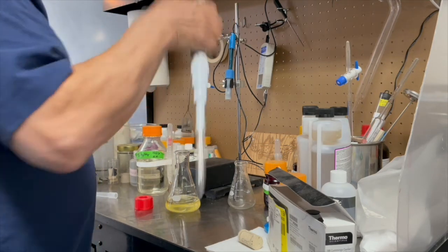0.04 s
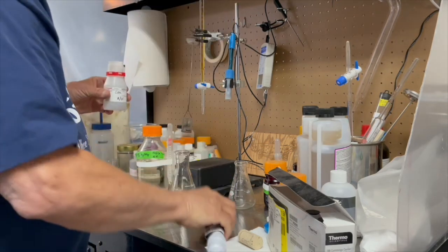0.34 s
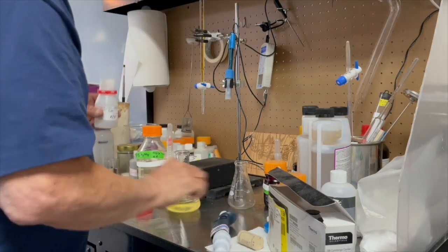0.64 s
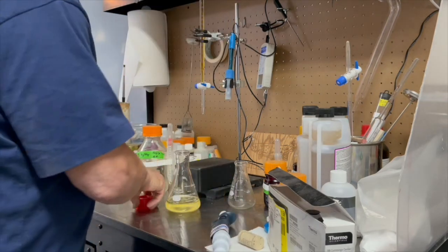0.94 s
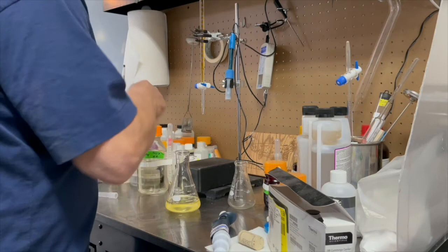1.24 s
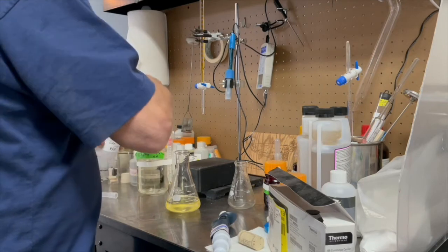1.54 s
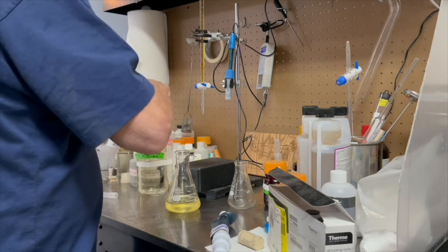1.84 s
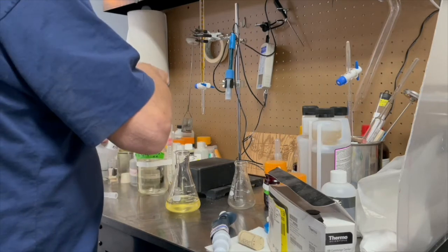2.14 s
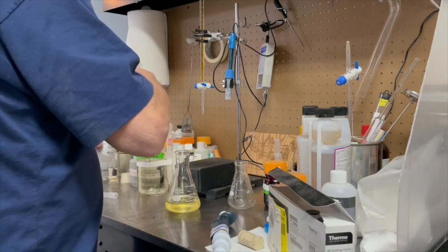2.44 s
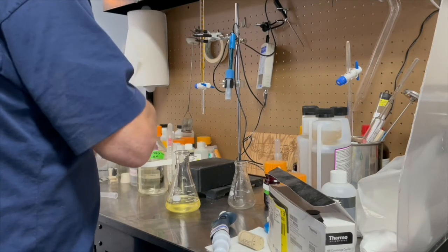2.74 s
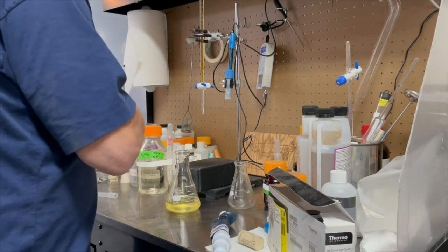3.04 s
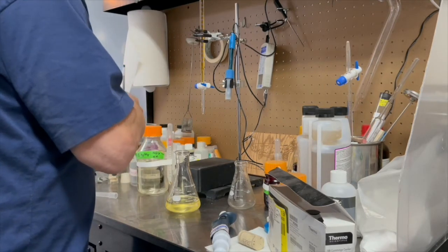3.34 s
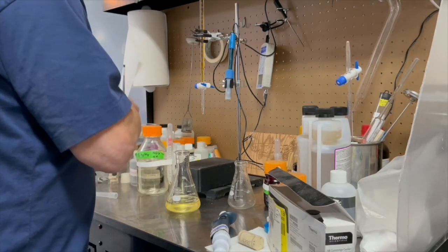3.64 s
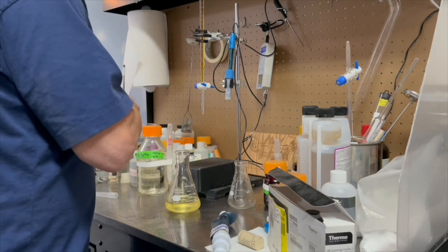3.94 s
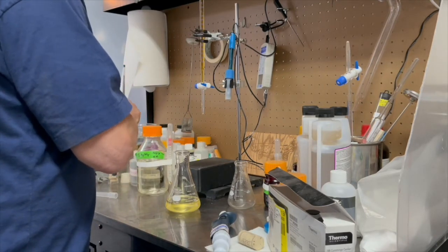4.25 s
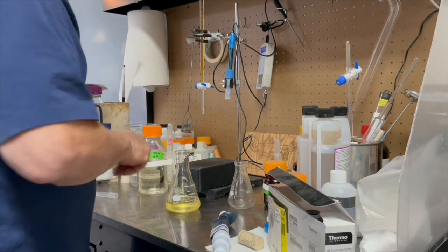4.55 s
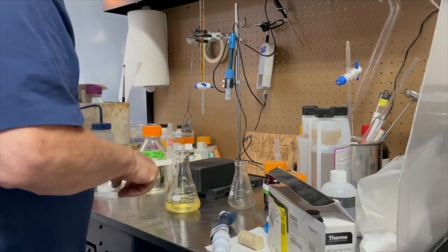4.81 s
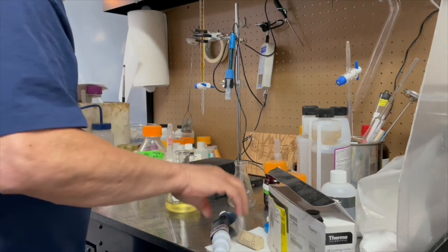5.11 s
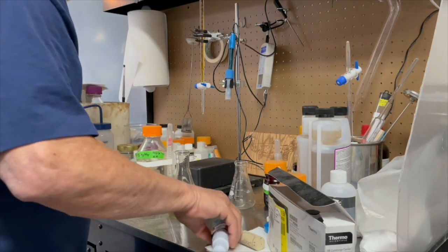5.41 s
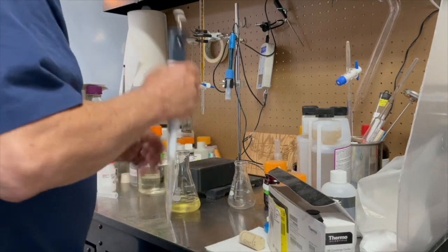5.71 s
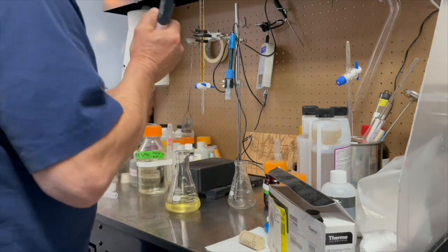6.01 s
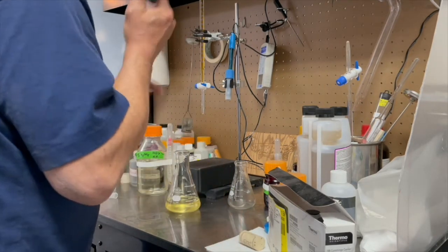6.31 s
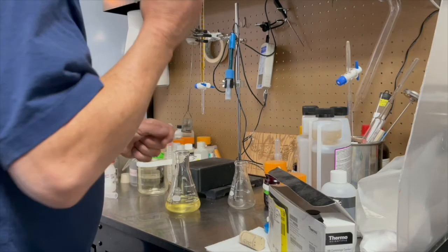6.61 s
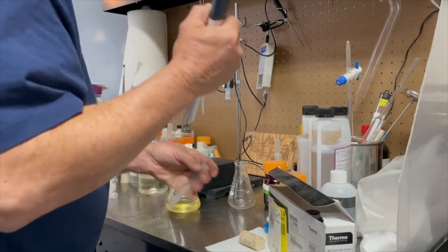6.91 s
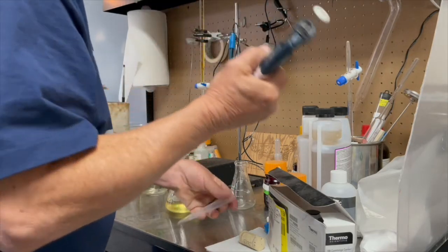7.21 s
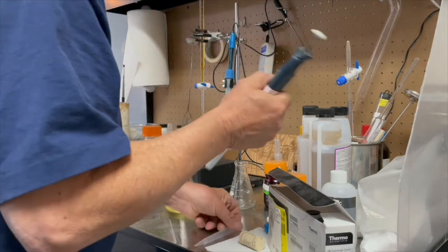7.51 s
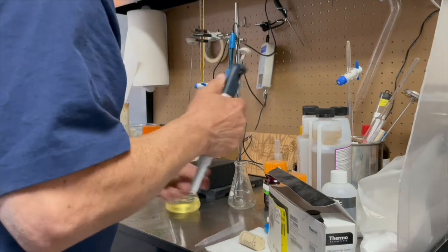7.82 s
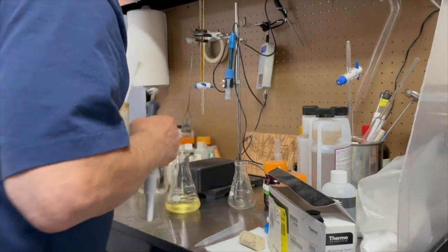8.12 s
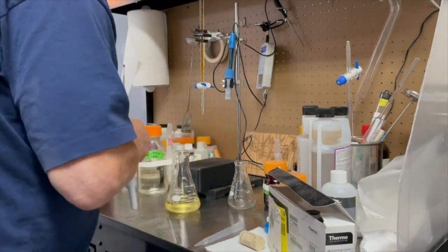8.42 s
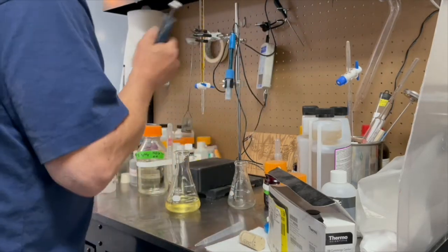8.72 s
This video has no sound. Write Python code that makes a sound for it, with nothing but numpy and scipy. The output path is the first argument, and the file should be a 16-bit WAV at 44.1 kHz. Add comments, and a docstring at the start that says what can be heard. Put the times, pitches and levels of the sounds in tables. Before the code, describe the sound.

Plastic thuds and rattles on metal, a bottle cap pops and rasps shut, and a pipette clicks in a quietly humming lab.

```python
"""Pipette and bottle at a lab bench

A dropped pipette thumps a steel bench and rocks to rest. A plastic cap pops onto a bottle and is
screwed down in short twists, rasping and catching on the thread; the bottle lands with a dull knock.
The pipette is picked up, its mechanism clicks and a hollow plastic tip clacks onto the bench.
Underneath, a sleeve rustles and the ventilation hums in the small room."""
import sys
import numpy as np
from scipy import signal
from scipy.fft import rfft, irfft, next_fast_len
from scipy.io import wavfile
from scipy.ndimage import uniform_filter1d

SR = 44100
rng = np.random.default_rng(int(sys.argv[2]) if len(sys.argv) > 2 else 0)


def file_out(sig):
    """Save sig as 16-bit WAV at sys.argv[1]."""
    # one column per channel
    cols = np.atleast_2d(sig).T
    # limit, then scale
    lim = np.clip(cols, -1, 1)
    pcm = np.round(lim * 32767).astype(np.int16)
    wavfile.write(sys.argv[1], SR, pcm)


N = 386316
TIME = np.arange(N) / SR
BLOCK = 4096   # samples in one hit or filter response

# tone of the cap rubbing on its thread: (frequency [Hz], level [dB])
CAP_COLOUR = [(100, -13.5), (400, 10), (850, -0.5), (1250, -5.5), (1650, -6.5), (2100, 1.5), (2700, -8.5),
              (3600, -12), (4600, -17.5), (7000, -23.5), (15000, -38.5)]
# tone of fingers on plastic: (frequency [Hz], level [dB])
GRIP_COLOUR = [(400, 10), (1800, 3.5), (3500, -0.5), (7000, -6), (15000, -12.5)]


def from_db(db):
    """Decibels to gain."""
    return 10 ** (np.asarray(db) / 20)


def unit_rms(x):
    """Scale to rms 1."""
    return x / np.sqrt(np.mean(x ** 2) + 1e-20)


def at_hz(points, hz):
    """Read a curve on a log-frequency axis."""
    freqs, values = np.transpose(points)
    return np.interp(np.log(np.maximum(hz, 1)), np.log(freqs), values)


def decay(t, t60):
    """Envelope that loses 60 dB in t60 seconds."""
    return np.exp(-np.log(1000) * t / t60)


def add(track, start_s, sound):
    """Mix a sound into a track."""
    i = max(round(start_s * SR), 0)
    track[i:i + len(sound)] += sound[:N - i]


def panned(x, left_db):
    """Make the left channel louder than the right by left_db."""
    return x * from_db([[left_db / 2], [-left_db / 2]])


def coloured(x, colour, tilt_db=0):
    """Minimum-phase EQ that gives a short drive its broad tone, tilted per octave; energy 1."""
    hz, drive = np.fft.rfftfreq(len(x), 1 / SR), rfft(x)
    drive_tone = np.sqrt(uniform_filter1d(np.abs(drive) ** 2, size=len(hz) // 45) + 1e-12)
    gain = from_db(at_hz(colour, hz) + tilt_db * np.log2(np.maximum(hz, 200))) / drive_tone
    cepstrum = irfft(np.log(gain))
    cepstrum[len(hz) - 1:] = 0   # no ringing ahead of the attack
    sound = irfft(drive * np.exp(2 * rfft(cepstrum)))
    return sound / np.linalg.norm(sound)


def filtered(x, colour):
    """Give a long white signal its tone; rms 1."""
    response = coloured(signal.unit_impulse(BLOCK), colour)
    return unit_rms(signal.oaconvolve(x, response)[:N])


def resonating(x, modes):
    """The drive plus the ringing of every mode that it feeds."""
    return x + sum(from_db(db) * signal.lfilter(*signal.iirpeak(hz, hz / width, fs=SR), x)
                   for hz, width, db in modes)


def dispersed(x, below_hz):
    """Bending waves: the lows travel slower, which smears each click a little."""
    pole = np.exp(-2 * np.pi * below_hz / SR)
    return signal.lfilter([-pole, 1], [1, -pole], x)


def diffuse(a, b):
    """Two unrelated signals become a stereo field, wide in the mids, narrow in bass and treble."""
    # likeness of left and right: (frequency [Hz], correlation [0-1])
    likeness = [(60, .88), (200, 0.91), (400, 0.37), (750, .0), (1300, 0.16), (2200, 0), (4400, 0.99),
                (8000, 1), (14000, 1)]
    size = next_fast_len(len(a), real=True)
    alike = np.clip(at_hz(likeness, np.fft.rfftfreq(size, 1 / SR)), -.99, .99)
    mid = rfft(a, size) * np.sqrt((1 + alike) / 2)
    side = rfft(b, size) * np.sqrt((1 - alike) / 2)
    return irfft([mid + side, mid - side], size)[:, :len(a)]


def struck(force, level_db, colour, tilt_db):
    """The sound of a short force on an object; the level is that of its energy spread over 5 ms."""
    return from_db(level_db) * coloured(force, colour, tilt_db) * np.sqrt(.005 * SR)


def contact(level_db, colour, tilt_db, shiver_db, shiver_t60):
    """A click followed by a shiver: the dense, quickly dying vibration of the object."""
    shiver_low_hz = 449   # below this an object has only its few separate modes
    force = rng.standard_normal(BLOCK) * decay(TIME[:BLOCK], shiver_t60)
    force = signal.sosfilt(signal.butter(2, shiver_low_hz, "high", fs=SR, output="sos"), force)
    force *= from_db(shiver_db) / np.linalg.norm(force)
    force[0] = 1   # the click
    return struck(force, level_db, colour, tilt_db)


def hits(rows, colour, shiver_db, shiver_t60):
    """A run of contacts on one object."""
    out = np.zeros(N)
    for start_s, level_db, tilt_db in rows:
        add(out, start_s, contact(level_db, colour, tilt_db, shiver_db, shiver_t60))
    return out


def friction(colour, slips_per_s, spread_db):
    """Countless tiny slips of uneven size blend into a grainy hiss."""
    slipping = rng.random(N) < slips_per_s / SR
    sizes = from_db(spread_db * np.minimum(rng.exponential(1, N), 4))
    return filtered(slipping * sizes * rng.standard_normal(N), colour)


def strokes(rows):
    """Pressure swells and fades within each stroke."""
    out = np.zeros(N)
    for start_s, length_s, level_db in rows:
        add(out, start_s, from_db(level_db) * signal.windows.tukey(max(int(length_s * SR), 2), .5))
    return out


def room_echo(build_s):
    """Small-room response: reflections build up quickly and die sooner in the treble."""
    # room decay: (frequency [Hz], t60 [s])
    room_t60 = [(100, 0.67), (400, 0.59), (1200, 0.42), (3000, 0.33), (7000, 0.36), (15000, 0.23)]
    t = TIME[:SR * 3 // 4]
    hz = np.fft.rfftfreq(len(t), 1 / SR)
    white, tail = rfft(rng.standard_normal((2, len(t)))), 0
    centres, t60s = np.transpose(room_t60)
    for share, centre_hz, t60 in zip(np.eye(len(centres)), centres, t60s):
        band = irfft(white * at_hz(np.column_stack([centres, share]), hz), len(t))
        # the clutter behind the bench throws back the higher sounds first, briefly
        early = 1 + (centre_hz > 700) * from_db(-4) * decay(t, t60=.15)
        tail = tail + band * decay(t, t60) * early
    tail = tail * (1 - np.exp(-t / build_s))
    return diffuse(*unit_rms(tail)) / np.sqrt(len(t))


def ventilation():
    """A bed of dull rushing air with a few slightly wavering fan tones."""
    # tone of the moving air: (frequency [Hz], level [dB])
    air_colour = [(12, -36.5), (26, -25), (45, 0), (80, 1), (150, -4), (260, -3.5), (310, -8.5),
                  (380, -7.5), (560, -12.5), (800, -16.5), (1600, -35.5), (3800, -47.5), (7000, -52),
                  (14000, -57.5)]
    # fan and mains tones: (frequency [Hz], level [dB])
    hum_tones = [(70, -61), (258.4, -58), (360.3, -53.5), (479.5, -65)]
    air = diffuse(*[filtered(white, air_colour) for white in rng.standard_normal((2, N))])
    hum, knots = 0, np.linspace(0, TIME[-1], 30)
    for hz, level_db in hum_tones:
        waver_rad = np.interp(TIME, knots, rng.normal(0, 0.089, len(knots)))
        hum = hum + np.sqrt(2) * from_db(level_db) * np.sin(2 * np.pi * hz * TIME + waver_rad)
    return from_db(-48.5) * air + from_db(-2.0) * hum


def sleeve():
    """Cloth slides with a fine, high hiss that swells and dies with each movement of the arm."""
    # arm movements: (start [s], length [s], level [dB], change over the movement [dB])
    swishes = [(0.024, 0.4, -63.5, 12), (0.387, 0.27, -52.5, -5), (0.934, 0.44, -66, -14),
               (1.187, 0.46, -68, 4.5), (1.523, 0.44, -58.5, -9.5), (4.271, 0.73, -59, -7),
               (5.123, 0.44, -65.5, 0), (5.5, 0.26, -71, -2), (5.762, 0.16, -64, -3.5),
               (5.957, 0.15, -76, -3.5), (6.459, 0.98, -84, -2.5), (7.662, 0.51, -83, 11.5),
               (8.322, 0.17, -70, 3.5), (8.53, 0.32, -79, 4)]
    # tone of sliding cloth: (frequency [Hz], level [dB])
    cloth_colour = [(500, -20), (2000, -13), (4000, -25), (5500, -14.5), (9000, -6.5), (11900, -4.5),
                    (13300, -4), (16000, -24)]
    attack_s, release_s = 0.095, 0.14   # the arm gathers speed, then slows
    waver_db, wavers_per_s = 3.5, 22   # folds catch and let go
    speed = np.full(N, from_db(-85.5))   # the cloth is never quite still
    for start_s, length_s, level_db, change_db in swishes:
        t = TIME[TIME < length_s]
        ramp = np.clip(np.minimum(t / attack_s, (length_s - t) / release_s), 0, 1)
        add(speed, start_s, from_db(level_db + change_db * t / length_s) * np.sin(np.pi / 2 * ramp) ** 2)
    knots = np.arange(0, TIME[-1], 1 / wavers_per_s)
    folds = from_db(waver_db * np.interp(TIME, knots, rng.standard_normal(len(knots))))
    return speed * folds * friction(cloth_colour, slips_per_s=23000, spread_db=1.5)


def finger_rubs():
    """Fingers brush the cap and the pipette; each touch has a resonance of its own."""
    # brushes on plastic: (start [s], length [s], level [dB], resonance [Hz], resonance gain [dB])
    grips = [(0.883, 0.024, -67, 940, 25), (1.122, 0.032, -55, 1900, 7.5), (5.286, 0.14, -57.5, 2200, -16),
             (6.132, 0.065, -76.5, 1750, 24), (6.232, 0.079, -46, 4000, -6)]
    grain = friction(GRIP_COLOUR, slips_per_s=2900, spread_db=-2.0)
    out, grip_q = np.zeros(N), 2.9
    for start_s, length_s, level_db, hz, peak_db in grips:
        rub = strokes([(start_s, length_s, level_db)]) * grain + 1e-18
        out += resonating(rub, [(hz, hz / grip_q, peak_db)])
    return out


def handling_ticks():
    """As the pipette is picked up and moved, each light touch rings briefly at its own pitch."""
    # light touches: (time [s], level [dB], ring pitch [Hz])
    touches = [(5.2057, -62.5, 2380), (5.2263, -62.5, 1950), (5.263, -59, 3330), (5.3102, -64, 1900),
               (5.6095, -59, 4100), (6.6835, -66, 2740), (7.925, -65, 4100)]
    ring_width_hz, ring_db = 590, 11.5
    out = np.zeros(N)
    for start_s, level_db, hz in touches:
        touch = contact(level_db, GRIP_COLOUR, 0, shiver_db=22.0, shiver_t60=.035)
        add(out, start_s, resonating(touch, [(hz, ring_width_hz, ring_db)]))
    return out


def pipette_handling():
    """Sharp plastic clicks, over light ticks and the soft rub of the grip."""
    # the pipette striking the bench, handling ticks and snaps of its mechanism:
    # (time [s], level [dB], brightness [dB/octave])
    click_hits = [(.3143, -19.5, -3.5), (.89, -55.5, 5), (1.236, -50, 11.5), (5.4702, -55, 7),
                  (6.2294, -37.5, 0.5), (6.2508, -33, -2), (6.277, -42, 4), (6.684, -45, -0.5),
                  (6.7746, -57.5, 4), (6.83, -58.5, 3), (7.0196, -56, -2.5), (7.3119, -58, 3),
                  (7.3707, -26.5, 0), (7.3755, -32, -7)]
    # tone of a plastic click: (frequency [Hz], level [dB])
    click_colour = [(200, -29), (900, -2), (1700, -9), (2500, 2), (4000, -10), (7000, 0.5), (9500, 1.5),
                    (12500, -0.5), (16000, -9)]
    clicks = dispersed(hits(click_hits, click_colour, shiver_db=8.0, shiver_t60=.028), below_hz=10000)
    return from_db(-5.5) * clicks + from_db(-6.5) * handling_ticks() + from_db(-4.5) * finger_rubs()


def tip_drop():
    """The light, hollow tip clacks onto the bench and its thin wall rings briefly."""
    # landing and bounces: (time [s], level [dB], brightness [dB/octave])
    bounces = [(7.4724, -25, 0.5), (7.481, -35, -4.5), (7.4893, -35, -4.5)]
    # tone of the clack: (frequency [Hz], level [dB])
    tip_colour = [(100, -27), (550, -11), (850, -5.5), (1200, -7.5), (1750, -0.5), (2400, 2), (3200, -4),
                  (4000, -23), (4600, -14), (5200, -13), (6000, -31), (7400, -12), (10000, -21.5),
                  (15000, -27)]
    # thin wall of the tip: (frequency [Hz], width [Hz], gain [dB])
    tip_modes = [(865, 63, 7.5), (1137, 80, 1), (1680, 260, -5), (2400, 320, -9)]
    clack = hits(bounces, tip_colour, shiver_db=3.5, shiver_t60=0.0087)
    return from_db(-2.0) * dispersed(resonating(clack, tip_modes), below_hz=2800)


def bottle_set_down():
    """The bottle is set down with a dull knock, damped by the hand, and settles."""
    # base meeting the bench: (time [s], level [dB], brightness [dB/octave])
    landings = [(4.7627, -28, 4), (4.769, -27, 3.5), (4.778, -28, 1.5), (4.7925, -31, -3.5),
                (4.893, -47, 5), (4.906, -43, 3)]
    # tone of the knock: (frequency [Hz], level [dB])
    bottle_colour = [(60, -6), (160, 7), (260, 4.5), (520, 7), (850, -2), (1400, -6), (1700, -14),
                     (2700, -24.5), (4200, -38), (15000, -57)]
    # bottle against the bench: (frequency [Hz], width [Hz], gain [dB])
    bottle_modes = [(345, 33, -2), (504, 23, -5), (810, 120, 1), (1300, 74, -1.5), (2140, 100, 4),
                    (2720, 90, -2)]
    knock = hits(landings, bottle_colour, shiver_db=11.0, shiver_t60=0.049)
    return from_db(0.6) * dispersed(resonating(knock, bottle_modes), below_hz=2000)


def stick_slip(level_db, tilt_db):
    """One catch: the thread sticks and lets go in a gritty run of slips that swells and dies."""
    slips_per_s, length_s = 6000, 0.01
    slips = rng.standard_normal(BLOCK) * (rng.random(BLOCK) < slips_per_s / SR)
    pressure = np.sin(np.pi * np.minimum(TIME[:BLOCK] / length_s, 1))
    return struck(slips * pressure, level_db, CAP_COLOUR, tilt_db)


def creak_cues():
    """Rows for faint, hollow catches at random while the thread binds, also between the twists."""
    start_s, length_s, creaks_per_s = 2.2, 1.25, 52
    mean_db, spread_db, tilt_db, hollow_db = -51, 3, 0, -4
    rows = []
    for when, softness, pitch in rng.random((int(creaks_per_s * length_s), 3)):
        level_db = mean_db - spread_db * np.sqrt(12) * (softness - .5)
        hollow_hz = 1600 + 750 * pitch
        rows.append((start_s + length_s * when, level_db, tilt_db, hollow_hz, hollow_db))
    return rows


def thread_catches():
    """Each catch rings the cap's hollow, retuned by the fingers, and its rim."""
    # hard catches: (time [s], level [dB], brightness [dB/octave], hollow pitch [Hz], hollow gain [dB])
    hard_catches = [(1.3114, -35.5, 2, 2320, -3), (1.328, -30, -0.5, 2110, -11),
                    (1.4017, -34.5, 0, 2000, -4), (1.4505, -27.5, 5, 2550, -19),
                    (1.607, -37.5, 10, 2080, 7), (1.6457, -34, 5, 1930, -5), (1.9755, -38, 5.5, 2110, -11),
                    (2.0383, -39, 4, 2140, 3.5), (2.2351, -33.5, -0.5, 2020, -3),
                    (2.2742, -27.5, 1.5, 2070, 3.5), (2.3122, -41, 7, 2200, -5),
                    (2.5135, -27.5, -1, 1870, -5), (2.5526, -28, 3.5, 2550, -13),
                    (2.7141, -30.5, 0, 2100, 4), (2.7455, -34, 0.5, 2110, -2),
                    (2.8848, -42.5, -1.5, 2060, 4), (2.981, -36, 2.5, 1900, 5),
                    (2.9865, -40.5, 3, 1890, -6), (3.1665, -34.5, 1, 2060, 9.5),
                    (3.2063, -38.5, 1, 1840, -2), (3.3385, -33, 0.5, 2080, -12), (3.347, -30, -1, 1970, 0),
                    (3.4045, -35, 3.5, 2150, -4), (3.4725, -45.5, 2, 2210, 10),
                    (3.5888, -39.5, 1.5, 2600, -16), (3.8758, -44, 7.5, 2600, -10)]
    width_hz, rim_db = 334, -9.5
    out = np.zeros(N)
    for start_s, level_db, tilt_db, hollow_hz, hollow_db in [*hard_catches, *creak_cues()]:
        rim_hz = 2450 + 1200 * rng.random()   # the rim rings wherever the thread happens to catch
        modes = [(hollow_hz, width_hz, hollow_db), (rim_hz, width_hz, rim_db)]
        add(out, start_s, resonating(stick_slip(level_db, tilt_db), modes))
    return dispersed(out, below_hz=1600)


def neck_pops():
    """The air in the bottle neck rings with a hollow pop as the cap plugs it."""
    # pops of the air: (time [s], level [dB], pitch [Hz])
    pops = [(1.3128, -23.5, 535), (1.403, -49, 432), (1.428, -30, 409), (1.451, -39, 456),
            (1.607, -34, 410)]
    out, t = np.zeros(N), TIME[:SR // 5]
    envelope = decay(t, t60=0.062) * (1 - decay(t, t60=0.002))
    for start_s, level_db, hz in pops:
        add(out, start_s, from_db(level_db) * np.sin(2 * np.pi * hz * t) * envelope)
    return out


def cap_screwing():
    """The cap pops onto the neck, then rasps and catches along the thread under hissing fingers."""
    # twists of the cap: (start [s], length [s], thread rasp [dB], finger hiss [dB])
    twists = [(1.29, 0.22, -54.5, -60.5), (1.569, 0.13, -49, -57), (1.952, 0.094, -46.5, -54),
              (2.228, 0.068, -49, -55), (2.44, 0.18, -51, -58.5), (2.711, 0.1, -50, -56.5),
              (2.995, 0.11, -59, -57), (3.318, 0.14, -61, -57.5), (3.608, 0.12, -48.5, -51),
              (3.908, 0.082, -58, -53)]
    # tone of the sliding fingers: (frequency [Hz], level [dB])
    hiss_colour = [(500, -33), (2000, 5), (4000, -7), (6500, -3), (9500, -4.5), (12000, -2), (13500, -2),
                   (16000, -17)]
    # wall of the cap and bottle neck: (frequency [Hz], width [Hz], gain [dB])
    cap_modes = [(855, 28, 3.5), (1764, 160, -3), (2740, 104, -5.5)]
    thread_pressure = strokes(np.array(twists)[:, [0, 1, 2]])
    finger_pressure = strokes(np.array(twists)[:, [0, 1, 3]])
    rasp = thread_pressure * friction(CAP_COLOUR, slips_per_s=5000, spread_db=2.0)
    fingers = finger_pressure * friction(hiss_colour, slips_per_s=14000, spread_db=3.0)
    wall = resonating(from_db(-3.0) * rasp + from_db(-7.5) * thread_catches(), cap_modes)
    return neck_pops() + wall + from_db(-0.5) * fingers


def pipette_drop():
    """The heavy body of the pipette thumps the steel top; its light taps stir only its own barrel."""
    # body landing on the bench: (time [s], level [dB], brightness [dB/octave])
    thump_hits = [(.3178, -10, 0), (.3205, -20.5, 0), (.4352, -15, 0.5), (.4385, -20.5, -4.5),
                  (.4595, -23, -13.5), (.526, -33, -11.5), (.585, -36.5, 0)]
    # tone of a thump: (frequency [Hz], level [dB])
    thump_colour = [(40, -28), (115, -8.5), (230, -0.5), (380, 2), (520, -6.5), (650, -10.5), (850, -6.5),
                    (1100, -8.5), (1600, -10), (3000, -22), (6000, -35.5), (15000, -42.5)]
    # steel bench top: (frequency [Hz], width [Hz], gain [dB])
    bench_modes = [(134, 8, -5), (161, 7, 6), (265, 23.3, -3), (335.5, 9, -0.5), (412.7, 10, 0.5),
                   (438.7, 15, -2.5), (527, 14, -7), (845, 60, -3.5), (1317, 88, -7), (1660, 90, -7)]
    # hard plastic tapping the bench: (time [s], level [dB], brightness [dB/octave])
    tap_hits = [(.3178, -25, 0), (.45, -26.5, -0.5), (.476, -35, 0), (.4965, -34, -8), (.5253, -22, -2.5),
                (.585, -41.5, 0.5), (.6485, -30, -4.5), (.7083, -37, -8)]
    # tone of a tap: (frequency [Hz], level [dB])
    tap_colour = [(100, -20.5), (500, -19.5), (850, -8.5), (1100, -11.5), (1500, -5.5), (2500, -2),
                  (3200, -9), (4300, -15.5), (7500, -20.5), (15000, -29)]
    # barrel of the pipette: (frequency [Hz], width [Hz], gain [dB])
    barrel_modes = [(1298, 62, 0), (2406, 70, -4), (2930, 130, -4.5), (3680, 98, -6.5)]
    thumps = from_db(-0.5) * hits(thump_hits, thump_colour, shiver_db=8.5, shiver_t60=0.029)
    taps = from_db(1.0) * hits(tap_hits, tap_colour, shiver_db=7.0, shiver_t60=0.011)
    steel = resonating(dispersed(thumps, below_hz=1100), bench_modes)
    return dispersed(steel + resonating(taps, barrel_modes), below_hz=1600)


def scene():
    """Close sounds, room and ventilation, all a little left of centre."""
    drop, bottle, cap = pipette_drop(), bottle_set_down(), cap_screwing()
    handling, cloth, tip = pipette_handling(), sleeve(), tip_drop()
    # the cap is turned behind the body, so more of it arrives by way of the walls
    send = (from_db(-3.5) * drop + from_db(-2.5) * bottle + from_db(-1.0) * cap
            + from_db(-3.0) * handling + from_db(-5.5) * cloth + from_db(-6.5) * tip)
    room = signal.fftconvolve(send[None], room_echo(build_s=0.0013), axes=1)[:, :N]
    direct = (panned(drop + bottle + tip, left_db=2.75) + panned(cap, left_db=2.5)
              + panned(handling + cloth, left_db=1.5))
    return direct + panned(room, left_db=1.5) + panned(ventilation(), left_db=1.9)


def record(dry):
    """The two microphone ports differ in phase in the treble; the top is cut steeply."""
    # lead of the left port over the right: (frequency [Hz], phase [rad])
    port_phase = [(150, 0), (1600, -.1), (3000, .9), (4300, .5), (5300, .6), (5900, -1.7), (7000, -1.5),
                  (7700, -2.8), (9700, -3.5), (12200, -6), (16000, -6.3)]
    cutoff_hz = 15700
    size = next_fast_len(N + SR // 10, real=True)
    phase_turn = np.exp(1j * at_hz(port_phase, np.fft.rfftfreq(size, 1 / SR)))
    left = irfft(rfft(dry[0], size) * phase_turn, size)[:N]
    return signal.sosfilt(signal.ellip(10, .1, 80, cutoff_hz, fs=SR, output="sos"), [left, dry[1]])


dry = scene()
out = record(dry)
file_out(out)
```